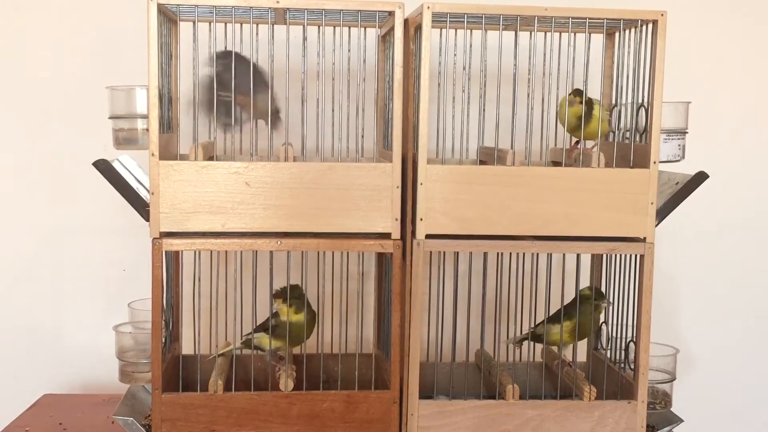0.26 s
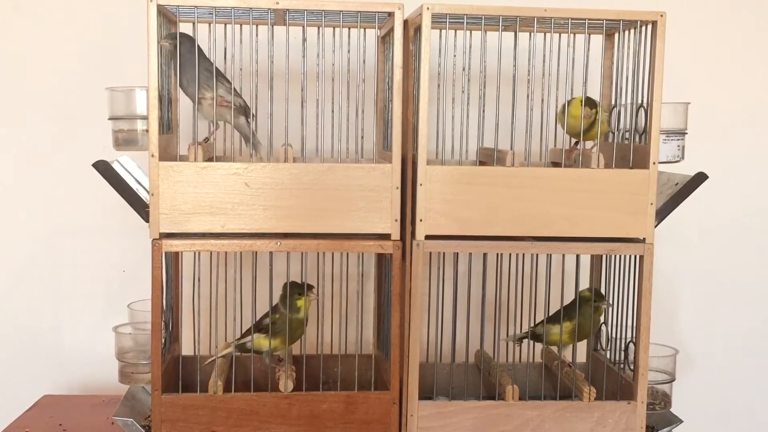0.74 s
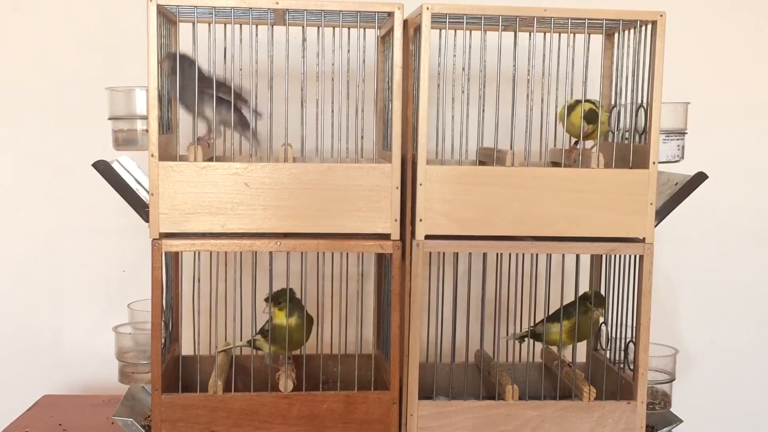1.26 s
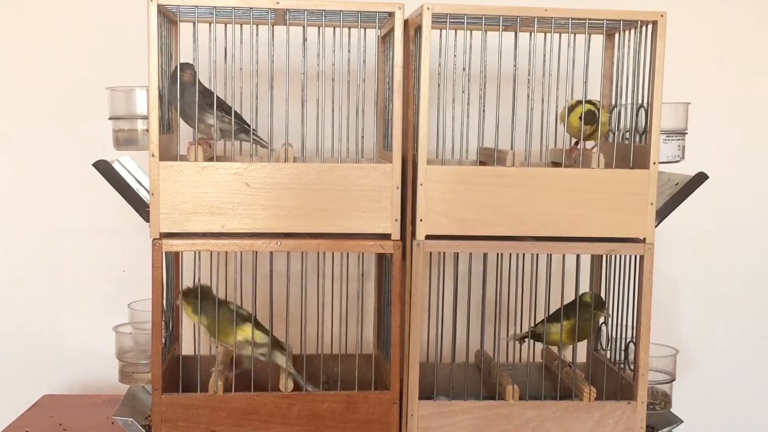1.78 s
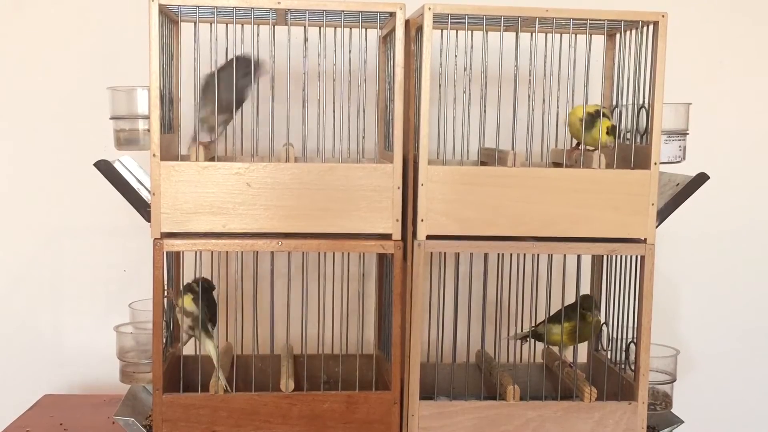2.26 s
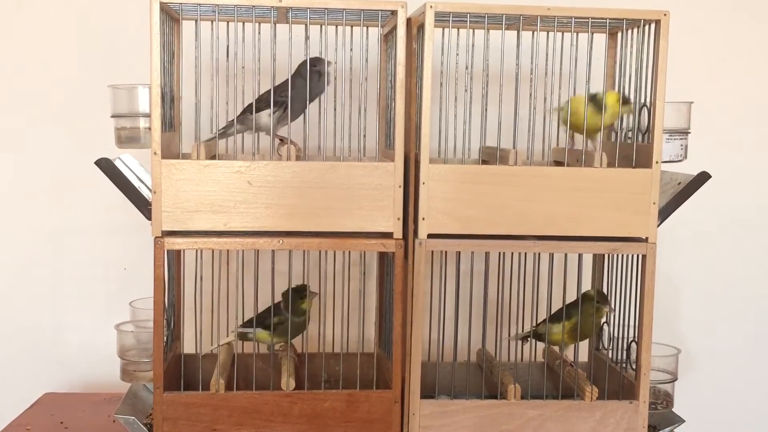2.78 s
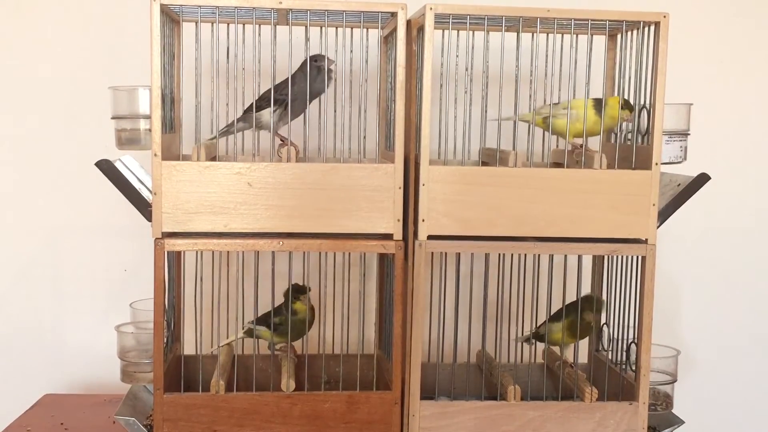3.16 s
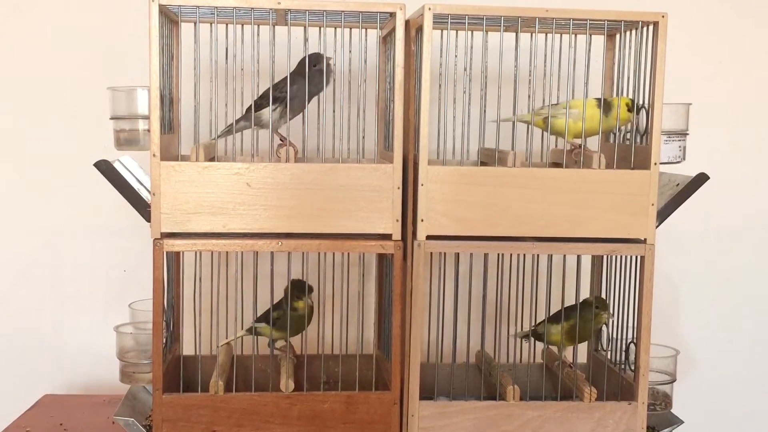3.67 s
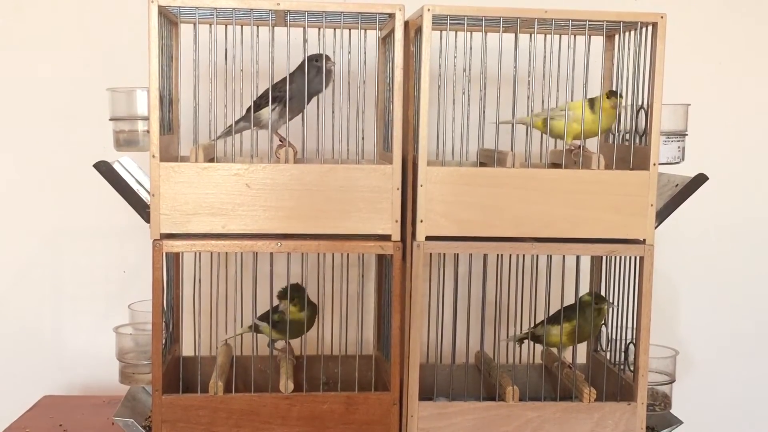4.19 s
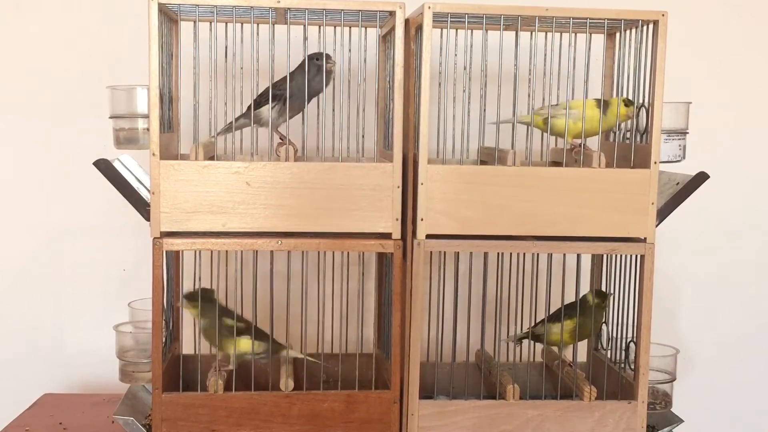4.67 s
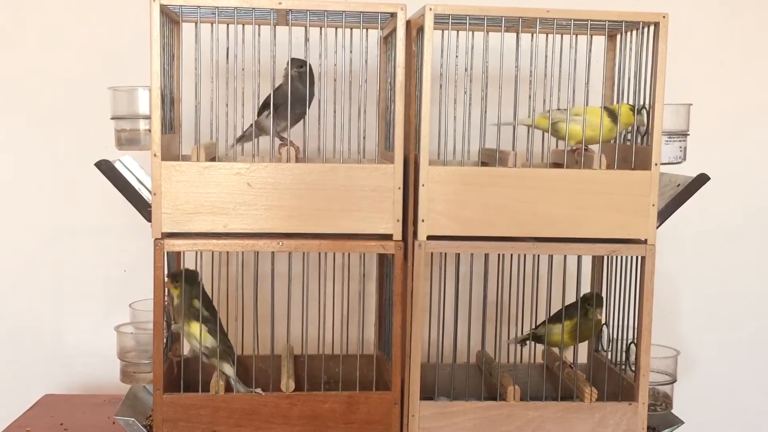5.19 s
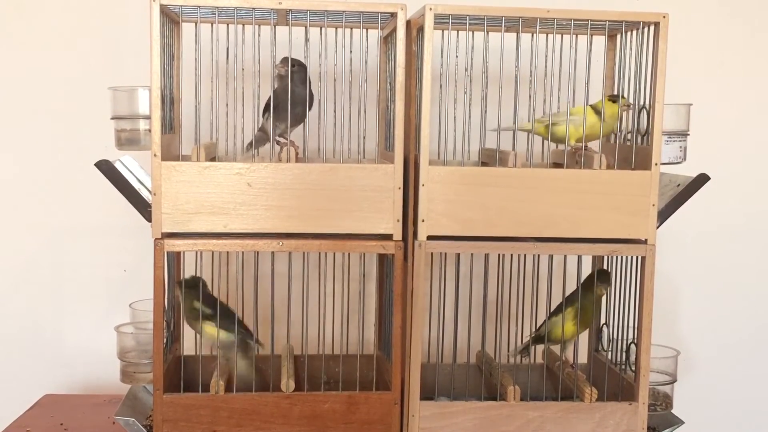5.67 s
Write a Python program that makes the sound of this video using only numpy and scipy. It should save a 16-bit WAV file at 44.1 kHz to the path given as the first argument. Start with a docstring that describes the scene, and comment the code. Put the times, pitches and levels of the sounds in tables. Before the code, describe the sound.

Close to the microphone, a canary gives short bright cheeps and one falling chirp, with faint warbled replies from across the small room. Its song follows: three unhurried phrases with clear whistled endings, a louder run of rapid repeated notes, two lower hoots and stuttering pips. Underneath, feet knock lightly on wooden perches, beaks and claws tick on bars and the cages thump softly over a faint room tone.

```python
"""Canaries in a bare room

Canaries sing in wooden cages: cheeps, a chirp, three slow slurred phrases, a fast trill, two hoots and a
stutter; a farther bird answers. Each voice is a vibrating syrinx membrane, filtered by the throat.
Feet ring the modes of the perches, beaks tick on the bars and the cages thump softly.
The small room adds early reflections and a diffuse tail over a quiet room tone."""
import sys
import numpy as np
from scipy import signal
from scipy.fft import rfft, irfft
from scipy.io import wavfile
from scipy.ndimage import uniform_filter1d, map_coordinates

SR = 44100
rng = np.random.default_rng(int(sys.argv[2]) if len(sys.argv) > 2 else 0)


def pcm_store(signal):
    """Save signal as 16-bit PCM."""
    levels = np.round(np.clip(np.atleast_2d(signal), -1, 1) * 32767)
    wavfile.write(sys.argv[1], SR, levels.astype(np.int16).T)


N = 261954
CUTOFF_HZ = 15900


def from_db(db):
    """Amplitude ratio of a level in decibels."""
    return 10 ** (np.asarray(db) / 20)


def at_hz(points, hz):
    """Interpolation on a logarithmic frequency axis."""
    f, value = np.transpose(points)
    return np.interp(np.log(np.maximum(hz, 1)), np.log(f), value)


def add(track, start_s, sound):
    """Superposition: a sound sums into the track from its start time."""
    start = min(max(int(start_s * SR), 0), N)
    track[start:start + len(sound)] += sound[:N - start]


def coloured(spectrum, n):
    """Spectral shaping of white noise, scaled to unit rms."""
    gain = from_db(at_hz(spectrum, np.fft.rfftfreq(n, 1 / SR)))
    noise = irfft(rfft(rng.standard_normal(n)) * gain, n)
    return noise / np.sqrt(np.mean(noise ** 2) + 1e-20)


def flutter(n, hz):
    """Smooth random modulation up to about hz, with a spread near 1."""
    knots = rng.standard_normal(1024)
    return map_coordinates(knots, [np.arange(n) * 2 * hz / SR], order=3, mode="wrap")


def high_pass(x, hz, order):
    """A maximally flat filter attenuates the lows."""
    return signal.sosfilt(signal.butter(order, hz, "high", fs=SR, output="sos"), x)


# spectra of the steady noise and of the rumble: frequency_hz, gain_db
AMBIENT_SPECTRUM = [(15, -31.5), (25, 10.5), (74, 2), (293, 2), (624, -5), (734, -5.5), (1330, -2.5),
                    (1480, 0), (2830, -5.5), (4250, -10.5), (6730, -13), (10700, -17), (14000, -15),
                    (16000, -20.5)]
RUMBLE_SPECTRUM = [(20, -16), (50, -3), (100, -3.5), (160, -3.5), (300, -18), (900, -59)]
# envelope of the rumble: time_s, level_db
RUMBLE_SWELL = [(0, -78), (3.4, -79.5), (3.65, -69.5), (4.051, -70), (4.3, -81.5), (5.94, -92.5)]


def room_tone(steady_db=-67.5):
    """Ambient noise: a stationary broadband floor and a low rumble that swells briefly."""
    rumble_db = np.interp(np.arange(N) / SR, *np.transpose(RUMBLE_SWELL))
    steady = from_db(steady_db) * coloured(AMBIENT_SPECTRUM, N)
    return steady + from_db(rumble_db) * coloured(RUMBLE_SPECTRUM, N)


# reverberation time: frequency_hz, t60_s
TAIL_DECAY = [(300, 0.32), (1400, 0.42), (3000, 0.4), (9000, 0.29), (16000, 0.079)]
# spectrum of the diffuse field: frequency_hz, gain_db
TAIL_SPECTRUM = [(200, -2.5), (1500, -1.5), (3000, 0), (6000, -0.5), (16000, -6.5)]


def reverberation(x, build_s=0.013):
    """A diffuse field builds up quickly and decays exponentially, soonest in the treble."""
    t = np.arange(SR * 3 // 4) / SR
    edges, tail = np.geomspace(60, 17000, 12), 0
    for low, high in zip(edges, edges[1:]):
        centre = np.sqrt(low * high)
        band_pass = signal.butter(3, [low, high], "band", fs=SR, output="sos")
        band = signal.sosfilt(band_pass, rng.standard_normal(len(t)))
        decay = np.exp(-np.log(1000) * t / at_hz(TAIL_DECAY, centre)) * (1 - np.exp(-(t / build_s) ** 2))
        tail = tail + band * decay / np.linalg.norm(decay) * from_db(at_hz(TAIL_SPECTRUM, centre))
    return signal.fftconvolve(x, tail)[:N]


# paths by way of the cage and room walls: delay_s, gain_db
WALL_PATHS = [(.0033, -24), (.0066, -7), (0.0155, -9.5), (.028, -7.5)]


def reflections(x):
    """Early reflections: the nearest walls return delayed, weaker copies."""
    out = np.zeros(N)
    for delay_s, gain_db in WALL_PATHS:
        add(out, delay_s, from_db(gain_db) * x)
    return out


def struck(hz, t60_s, contact_s=0.0012):
    """A damped mode swells over a soft contact, then decays exponentially."""
    t = np.arange(SR // 3) / SR
    onset = 1 - np.exp(-(t / contact_s) ** 2)
    return np.sin(2 * np.pi * hz * t) * np.exp(-np.log(1000) * t / t60_s) * onset


# soft blows to the cage boxes: start_s, level_db, pitch_hz
BOX_BLOWS = [(.426, -54.5, 412), (1.75, -50.5, 280), (1.92, -51.5, 266), (2.772, -57, 164),
             (3.577, -50, 369), (4.03, -54, 112), (4.034, -55, 195), (4.765, -51, 165), (5.141, -46.5, 275),
             (5.181, -52, 304), (5.2, -58, 430), (5.381, -55, 310)]


def cage_thumps():
    """Impact excitation: each blow rings one low, well-damped mode of a box."""
    out = np.zeros(N)
    for start_s, level_db, hz in BOX_BLOWS:
        add(out, start_s, from_db(level_db) * struck(hz, t60_s=0.062, contact_s=0.0013))
    return out


# beaks and claws on the bars: start_s, relative_level_db
BAR_CONTACTS = [(.255, -54), (.426, -38), (.489, -51), (.72, -55), (1.324, -50.5), (1.365, -50),
                (1.751, -51.5), (1.778, -46), (2.09, -52), (2.449, -40.5), (2.583, -50), (2.662, -52),
                (2.911, -43)]
# spectrum of a tick: frequency_hz, gain_db
TICK_SPECTRUM = [(400, -44), (1000, 2.5), (3000, 3.5), (5500, 4), (8000, 1), (12000, 0.5), (16000, -4.5)]


def bar_ticks(t60_s=0.07):
    """Friction noise: a scratch on a bar is a short, uneven broadband burst."""
    out, t = np.zeros(N), np.arange(SR // 10) / SR
    envelope = np.exp(-np.log(1000) * t / t60_s) * (1 - np.exp(-t / 0.002))
    for start_s, level_db in BAR_CONTACTS:
        scratch = envelope * from_db(3.9 * flutter(len(t), 150))
        add(out, start_s, from_db(level_db) * coloured(TICK_SPECTRUM, len(t)) * scratch / 2)
    return out


# feet on perches: start_s, relative_level_db, pitch_ratio
FOOTFALLS = [(.342, -49.5, 1.02), (1.078, -38.5, 0.9), (1.525, -51.5, 1.13), (1.63, -40, 1.03),
             (1.745, -37.5, 1.02), (1.876, -32, 1.04), (2.45, -49.5, .98), (2.634, -38.5, 0.89),
             (2.865, -46, 0.97), (2.918, -34, .98), (4.571, -43.5, 0.86), (4.61, -42, 0.98),
             (5.15, -50, .73), (5.345, -49.5, 0.72), (5.42, -46.5, 0.86), (5.8, -41.5, 0.88)]
# modes of perch and cage wall: frequency_hz, gain_db, t60_s
PERCH_MODES = [(283, -20, 0.051), (806, -16, 0.036), (840, -25, 0.11), (983, -2, 0.091), (1023.6, 3, 0.081),
               (1304, -5.5, 0.032), (1706, -9.5, 0.036)]
# claws sliding on wood: frequency_hz, gain_db
SCUFF_SPECTRUM = [(300, -37.5), (650, -11.5), (820, -5.5), (1100, 2), (1350, -31), (1750, -1), (2400, -45),
                  (6000, -57)]


def perch_knocks(mode_spread_db=2, scuff_db=-10, scuff_t60_s=0.076):
    """Modal vibration: a foot rings the wood while its claws add friction noise."""
    out, t = np.zeros(N), np.arange(SR // 10) / SR
    slide = np.exp(-np.log(1000) * t / scuff_t60_s) * (1 - np.exp(-t / 0.0016))
    for start_s, level_db, pitch in FOOTFALLS:
        ring = sum(from_db(db + mode_spread_db * rng.standard_normal()) * struck(hz * pitch, t60_s)
                   for hz, db, t60_s in PERCH_MODES)
        add(out, start_s, from_db(level_db) * ring / 2)
        add(out, start_s, from_db(level_db + scuff_db) * coloured(SCUFF_SPECTRUM, len(t)) * slide)
    return out


def contour(rows, stretch):
    """Linear interpolation of a note's breakpoints, sample by sample, with rounded corners."""
    times, *columns = np.transpose(rows)
    times = np.maximum.accumulate(times - times[0]) * stretch
    t = np.arange(int(times[-1] * SR) + 2) / SR
    return [uniform_filter1d(np.interp(t, times, c), size=65, mode="nearest") for c in columns]


def glide(length_s, first_hz, last_hz, attack_s, release_s):
    """A linear frequency sweep: its time, pitch and trapezoidal envelope."""
    t = np.arange(int(length_s * SR)) / SR
    envelope = np.clip(np.minimum(t / attack_s, (length_s - t) / release_s), 0, 1)
    return t, first_hz + (last_hz - first_hz) * t / length_s, envelope


def phase_of(hz, jitter=0.0048, jitter_hz=250):
    """Phase is the integral of frequency, which in a syrinx is never quite steady."""
    return 2 * np.pi * np.cumsum(hz * (1 + jitter * flutter(len(hz), jitter_hz))) / SR


# the throat's transmission of overtones: frequency_hz, gain_db
THROAT_RESPONSE = [(2200, 3), (3100, -6.5), (3800, -15.5), (4400, -31), (5400, -28.5), (6700, -37.5),
                   (8400, -36), (10500, -43), (13000, -40), (15500, -48.5)]
# hoarse air in the throat: frequency_hz, gain_db
BREATH_SPECTRUM = [(900, -33), (1800, 3.5), (2600, 7), (3500, 5), (4400, -10), (5500, -9.5), (6800, -19),
                   (8400, -17), (10500, -25), (15000, -25)]


def syrinx(phase, hz, level_db, octave_db, overtones_db, rough, rasp_hz=480, air_db=-4):
    """Source and filter: the throat weights a membrane's harmonics; roughness shakes them and adds air."""
    n = len(phase)
    phase = phase + rough * flutter(n, rasp_hz)
    wave = np.sin(phase) + from_db(at_hz(THROAT_RESPONSE, 2 * hz) + octave_db) * np.sin(2 * phase)
    for k in range(3, 11):
        gain = from_db(at_hz(THROAT_RESPONSE, k * hz) + overtones_db + 2 * flutter(n, 20))
        wave += gain * (k * hz < CUTOFF_HZ) * np.sin(k * phase)
    wave *= 1 + rough * flutter(n, rasp_hz) / 2
    wave += from_db(air_db) * rough * coloured(BREATH_SPECTRUM, n)
    return wave * from_db(level_db) * signal.windows.tukey(n, min(1, SR / 300 / n))


# the farther bird: start_s, length_s, first_hz, last_hz, level_db, warble_ratio
ANSWERS = [(0.028, .06, 1810, 1778, -53.5, 0.018), (.22, 0.044, 1760, 1760, -58.5, .02),
           (0.657, 0.051, 1823, 1830, -52, 0.048), (0.659, .11, 3357, 3050, -50, 0.082),
           (0.769, .12, 3260, 3270, -49, 0.066), (1.125, 0.15, 2508, 2174, -49, 0.046),
           (1.273, 0.12, 1882, 1748, -50, .016), (1.739, .1, 2680, 2156, -49.5, 0.0515),
           (1.955, 0.038, 1883, 1815, -44.5, 0.015), (2.0, 0.14, 1817, 1752, -54.5, 0.012)]


def far_bird():
    """Random frequency modulation warbles the soft notes from across the room."""
    out = np.zeros(N)
    for start_s, length_s, first_hz, last_hz, level_db, warble in ANSWERS:
        _, hz, envelope = glide(length_s, first_hz, last_hz, attack_s=0.01, release_s=0.01)
        phase = phase_of(hz, warble, jitter_hz=161.5)
        tone = syrinx(phase, hz, level_db, octave_db=-3.5, overtones_db=-2, rough=0.12)
        add(out, start_s, tone * envelope)
    return out


# a cheep passes from the lower voice to the upper: time_s, pitch_hz, lower_db, upper_db, roughness_ratio
CHEEP_SHAPE = [(0, 2290, -24, -64, .1), (.011, 2590, -15.5, -57, .1), (.026, 2500, 0, -46, .06),
               (.039, 2520, 1.5, -23, .14), (.054, 2490, -18.5, -3, .22), (.068, 2450, -25, -24, .18)]
# the cheeps: start_s, level_db, pitch_ratio, length_ratio, upper_gain_db
CHEEP_CALLS = [(.369, -17, 1.0, 1.0, -2.5), (.479, -19.5, 0.95, 0.54, -22), (1.415, -21, 0.99, 0.847, 3)]


def cheeps(interval=1.213, combination_db=-12, octave_db=7):
    """Nonlinear mixing: the two sides of the syrinx, a minor third apart, make a combination tone."""
    out = np.zeros(N)
    for start_s, level_db, pitch, length, upper_db in CHEEP_CALLS:
        hz, low_db, high_db, rough = contour(CHEEP_SHAPE, length)
        hz, low_db, high_db = hz * pitch, low_db + level_db, high_db + level_db + upper_db
        low_phase, high_phase = phase_of(hz), phase_of(hz * interval, jitter=0.0063)
        lower = syrinx(low_phase, hz, low_db, octave_db, overtones_db=4, rough=rough)
        upper = syrinx(high_phase, hz * interval, high_db, octave_db, overtones_db=11, rough=rough)
        combination = from_db(high_db + combination_db) * np.sin(2 * high_phase - low_phase)
        add(out, start_s, lower + upper + combination)
    return high_pass(out, 2514, order=6)   # rolls off from the lower voice down


# the whistle ending each slow phrase: start_s, length_s, first_hz, last_hz, bow_hz, level_db, overtones_db
FALLING_NOTES = [(2.572, 0.23, 1601, 1418, -21.5, -37, -6.5), (3.103, .28, 1580, 1420, 18.5, -36, 1),
                 (3.682, .29, 1596, 1444, 10, -34, 1.5)]


def whistles(scoop_hz=100, scoop_s=0.007, waver_db=2, dulling_db_per_s=17.5):
    """Downward frequency sweeps: clear notes slide in from above, waver and lose their high overtones."""
    out = np.zeros(N)
    for start_s, length_s, first_hz, last_hz, bow_hz, level_db, overtones_db in FALLING_NOTES:
        t, hz, envelope = glide(length_s, first_hz, last_hz, attack_s=0.016, release_s=0.027)
        hz = hz + scoop_hz * np.exp(-t / scoop_s) + bow_hz * np.sin(np.pi * t / length_s)
        level_db = level_db + waver_db * flutter(len(hz), 17.9)
        fading_db = overtones_db - dulling_db_per_s * t
        phase = phase_of(hz, jitter=0.0073, jitter_hz=30.04)
        tone = syrinx(phase, hz, level_db, octave_db=-1.5, overtones_db=fading_db, rough=0.008)
        add(out, start_s, tone * envelope)
    return out


# pitch and level contours of the syllables: time_s, pitch_hz, level_db
DIP_SHAPE = [(0, 2075, -20), (.008, 2063, -9.5), (.024, 1992, -7), (.033, 1952, -1), (.055, 1680, -19),
             (.075, 1730, -19.5), (.097, 1839, -2.5), (.11, 1870, -6.5)]
SLUR_SHAPE = [(0, 2835, -15), (.009, 2775, -10), (.022, 2688, -12.5), (.034, 2515, -4), (.069, 2235, -0.5),
              (.078, 2140, -14)]
CROAK_SHAPE = [(0, 2048, -4.5), (.005, 1947, -4.5), (.016, 1835, -4), (.024, 1900, -30)]
RISE_SHAPE = [(0, 1225, -21.5), (.006, 1434, -2.5), (.012, 1622, -3), (.022, 1740, -0.5), (.03, 1850, -6),
              (.046, 1776, -22)]
FLICK_SHAPE = [(0, 3417, -25), (.014, 3580, -4), (.024, 3710, -4), (.031, 4200, -11.5), (.036, 4500, -26)]
GRACE_SHAPE = [(0, 1360, -14.5), (.008, 1234, -10), (.021, 1170, -9), (.034, 1190, -12.5)]
HOOT_SHAPE = [(0, 1120, -29.5), (.011, 1390, -6), (.02, 1478, 0), (.031, 1611, -1), (.042, 1540, -8),
              (.052, 1328, -12.5)]
PIP_SHAPE = [(0, 3020, -6), (.002, 2507, 1), (.004, 2330, -1.5), (.008, 2170, -18)]
CHIRP_SHAPE = [(0, 3055, -20), (.009, 3013, -8), (.019, 2880, 0), (.034, 2540, -5.5), (.049, 2084, -22)]
# the chip, a short sharp burst followed by its quick echo: time_s, pitch_hz, level_db
CHIP_SHAPE = [(0, 3120, -6), (.0025, 3036, 2.5), (.008, 2883, -11), (.014, 2859, -18.5), (.018, 2915, -2),
              (.024, 2848, -8), (.036, 2870, -12.5), (.043, 2516, -12.5), (.056, 2460, -25)]
# each syllable by name: shape, octave_db
SYLLABLES = {"dip": (DIP_SHAPE, -4), "slur": (SLUR_SHAPE, -4), "croak": (CROAK_SHAPE, 3),
             "rise": (RISE_SHAPE, -6), "flick": (FLICK_SHAPE, -8), "chip": (CHIP_SHAPE, 4.5),
             "grace": (GRACE_SHAPE, 1.5), "hoot": (HOOT_SHAPE, -3), "pip": (PIP_SHAPE, -3),
             "chirp": (CHIRP_SHAPE, 1.5)}


def syllable(name, level_db, overtones_db, rough, pitch=1, length=1):
    """Frequency and amplitude modulation: a tone follows its contours, transposed and stretched."""
    shape, octave_db = SYLLABLES[name]
    hz, shape_db = contour(shape, length)
    jitter = 0.026 if name in ("chip", "grace") else 0.0045   # hard chips and lead-ins break up
    phase = phase_of(hz * pitch, jitter)
    return syrinx(phase, hz * pitch, level_db + shape_db, octave_db, overtones_db, rough)


def repeated(motif, repeats, pitch_spread=0.01204):
    """Random detuning: a motif recurs, its syllables never at quite the same pitch."""
    out = np.zeros(N)
    for time_s, level_db, pitch, length, bright_db in repeats:
        for offset_s, part_db, overtones_db, rough, name in motif:
            detuned = pitch * (1 + pitch_spread * rng.uniform(-1.04, 1))
            note = syllable(name, level_db + part_db, overtones_db + bright_db, rough, detuned, length)
            add(out, time_s + offset_s, note)
    return out


# motifs of the song: offset_s, level_db, overtones_db, roughness_ratio, syllable_name
PHRASE_MOTIF = [(0, 0, -2, .04, "dip"), (.146, -5.5, -9, 0.23, "slur"), (.217, -2.5, -9, .2, "croak")]
TRILL_MOTIF = [(-.114, -14.5, -11, 0.31, "grace"), (-.083, -6, -2.5, 0.1, "rise"),
               (-.041, -19.5, 13, .15, "flick"), (0, 0, 3, .13, "chip")]
HOOT_MOTIF = [(-.029, -9.5, -9, 0.19, "grace"), (0, 0, -5.5, 0.03, "hoot")]
# repeats of each motif: time_s, level_db, pitch_ratio, length_ratio, overtones_db
PHRASE_REPEATS = [(2.306, -27, .99, .9, 1), (2.836, -24, 1.005, 1.02, -1), (3.421, -23, .99, .99, 2)]
TRILL_REPEATS = [(4.138, -21.5, 1.002, 1.15, -0.5), (4.345, -19.5, 1.005, .95, -1),
                 (4.552, -19, 1.0, 1.06, -0.5), (4.762, -18, 1.006, 1.03, -1), (4.974, -18, 1.0, .9, 1),
                 (5.189, -18.3, 1.005, 0.91, 2), (5.4, -18.5, 1, 0.91, 1.5)]
HOOT_REPEATS = [(5.512, -25, 0.97, 1.02, -2), (5.646, -23.5, 0.98, .97, 0)]
# the closing pips: start_s, level_db, pitch_ratio, length_ratio
STUTTER = [(5.769, -31.5, 1.31, 2.04), (5.792, -28, .98, 1.6), (5.823, -31, 0.93, 1.7),
           (5.843, -22, .95, .8), (5.864, -21, 0.96, 1.09), (5.891, -19, 1.0, 1.0)]


def song():
    """Modulated tones in sequence: a loud falling chirp, slow phrases, a trill, hoots and a stutter."""
    out = np.zeros(N)
    add(out, start_s=1.848, sound=syllable("chirp", level_db=-18.5, overtones_db=10, rough=0.17))
    out += repeated(PHRASE_MOTIF, PHRASE_REPEATS)
    out += repeated(TRILL_MOTIF, TRILL_REPEATS)
    out += repeated(HOOT_MOTIF, HOOT_REPEATS)
    for start_s, level_db, pitch, length in STUTTER:
        pip = syllable("pip", level_db, overtones_db=-5, rough=0.22, pitch=pitch, length=length)
        add(out, start_s, pip)
    return out


def scene(near_to_room_db=-2, far_direct_db=-12):
    """Direct and reverberant fields: the farther bird is heard mostly through the room."""
    birds = high_pass(song() + whistles() + cheeps(), 850, order=4)   # so small a throat radiates no lows
    near = birds + perch_knocks() + bar_ticks() + cage_thumps()
    far = far_bird()
    direct = near + reflections(near) + from_db(far_direct_db) * far
    room = reverberation(from_db(near_to_room_db) * near + far) + room_tone()
    return high_pass(direct + room, 44, order=4)[None]   # the microphone's low limit


def record(dry):
    """Band limiting: an elliptic low-pass cuts the top steeply."""
    return signal.sosfilt(signal.ellip(10, .2, 80, CUTOFF_HZ, fs=SR, output="sos"), dry)


dry = scene()
out = record(dry)
pcm_store(out)
```